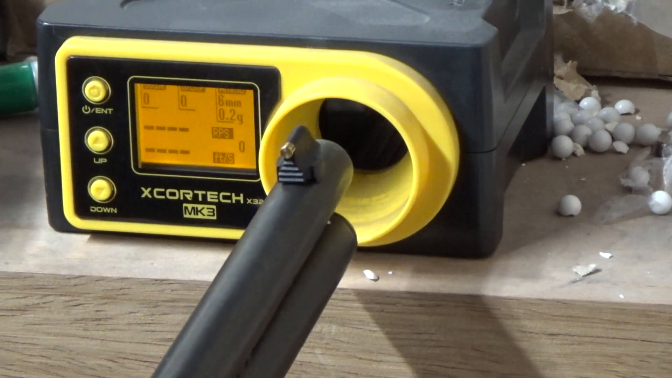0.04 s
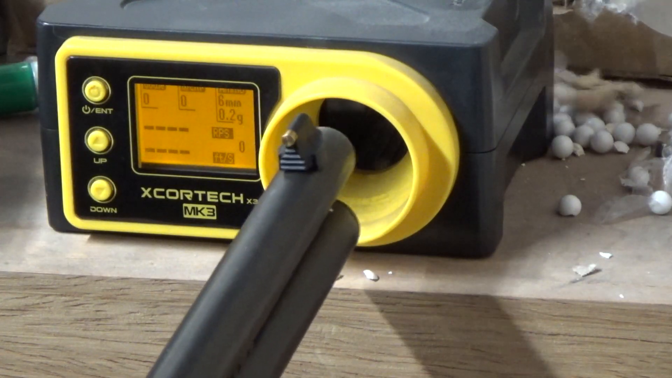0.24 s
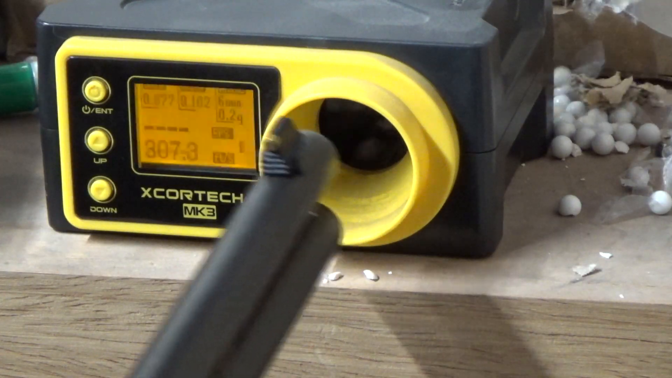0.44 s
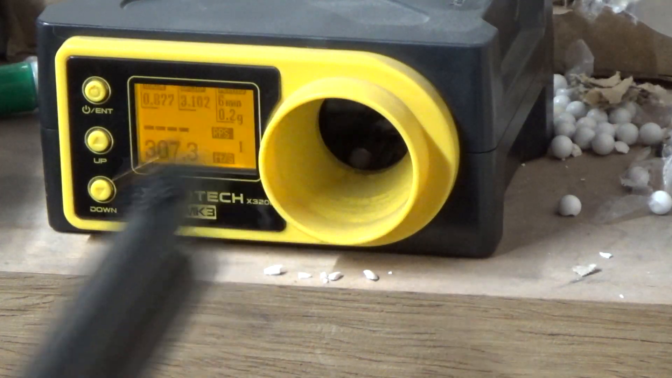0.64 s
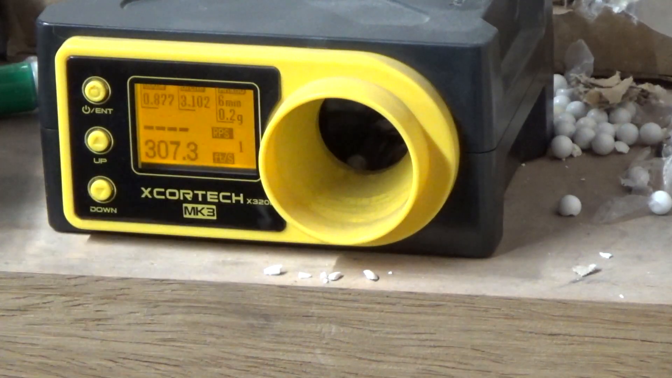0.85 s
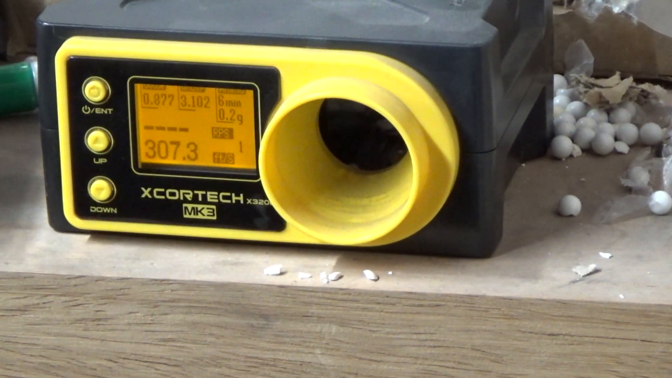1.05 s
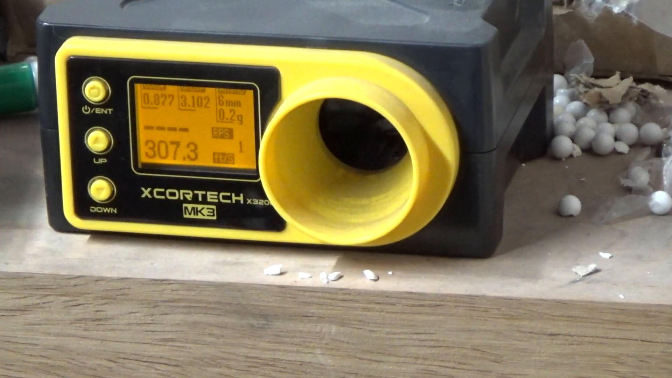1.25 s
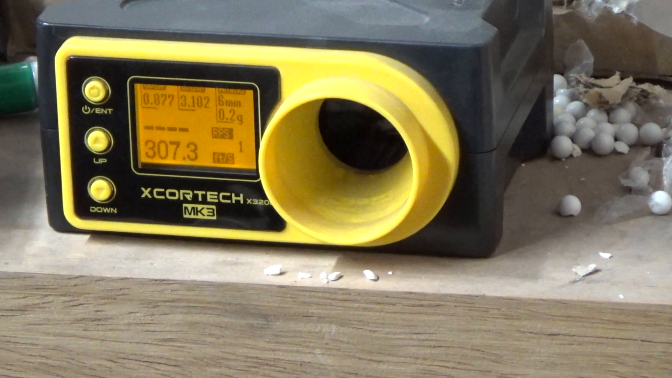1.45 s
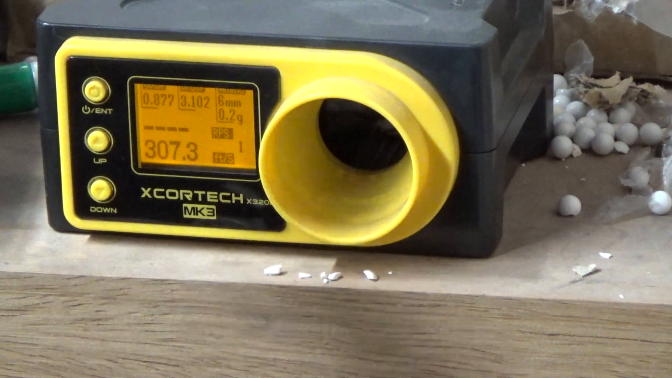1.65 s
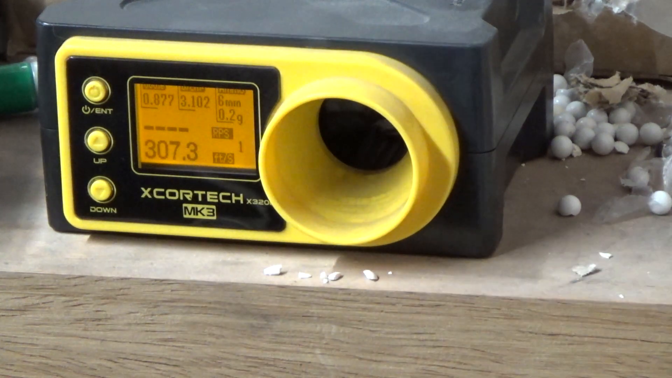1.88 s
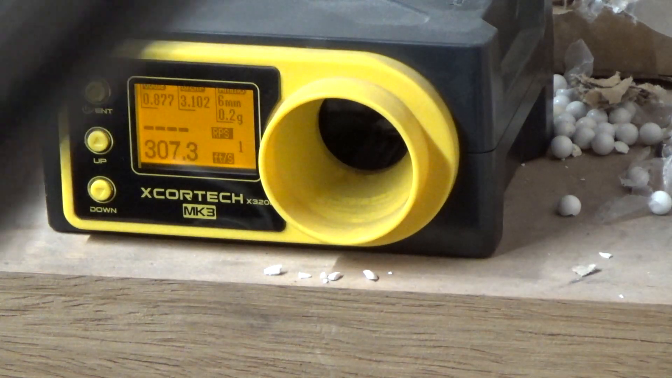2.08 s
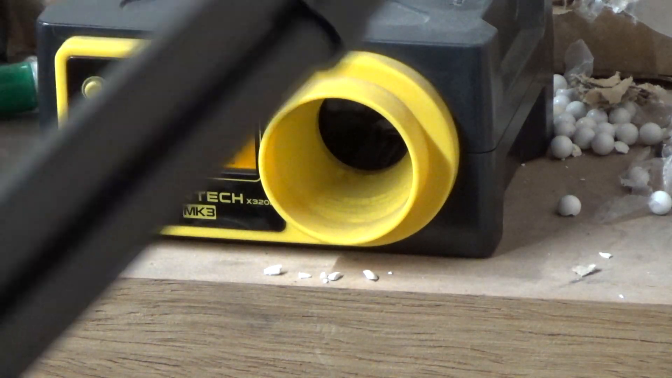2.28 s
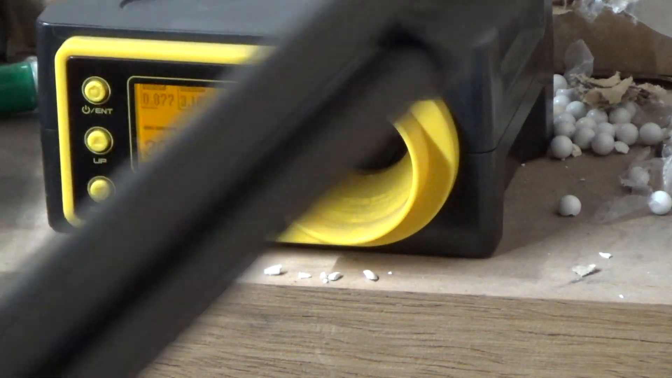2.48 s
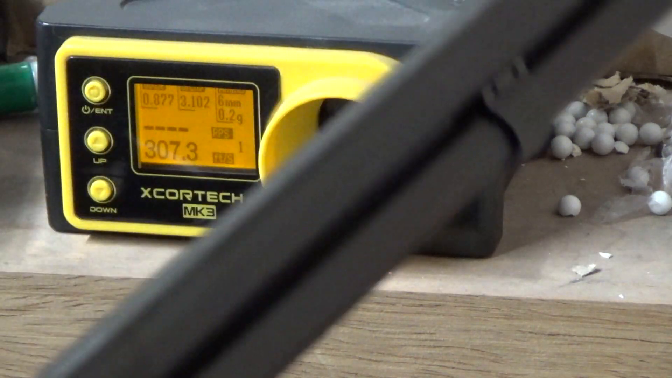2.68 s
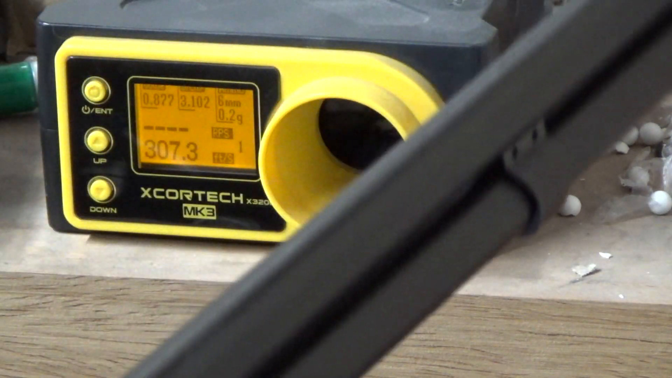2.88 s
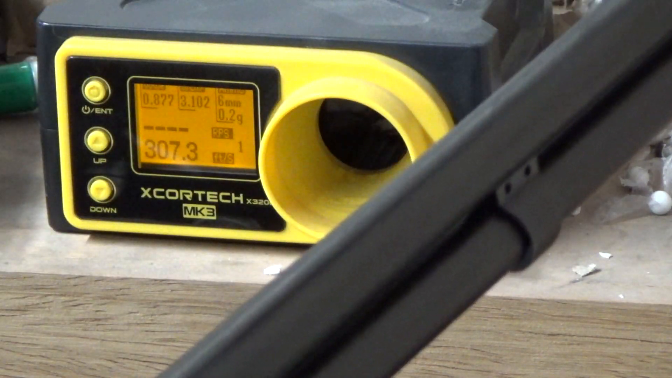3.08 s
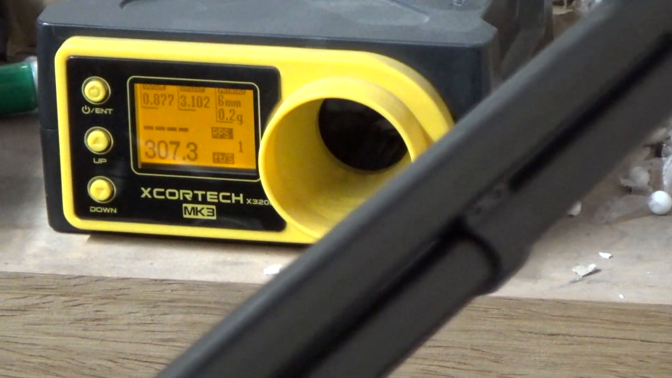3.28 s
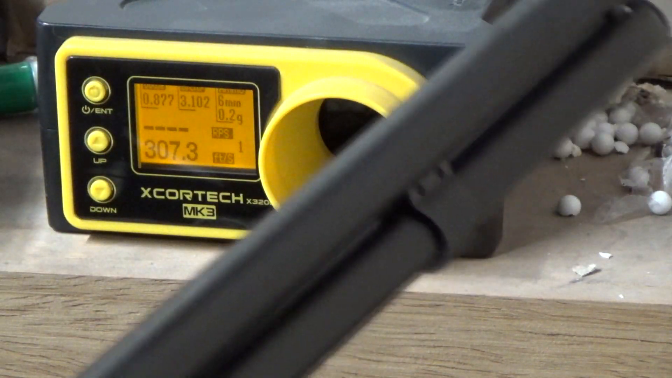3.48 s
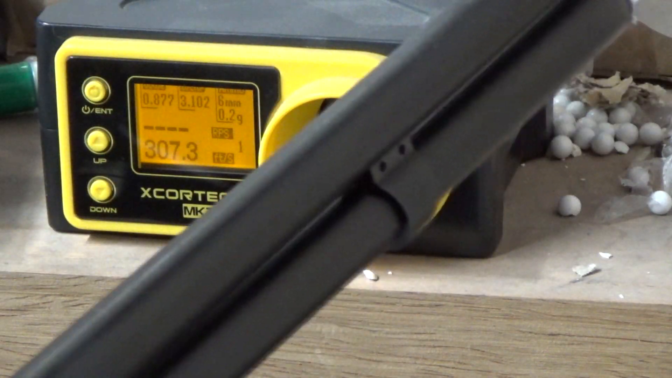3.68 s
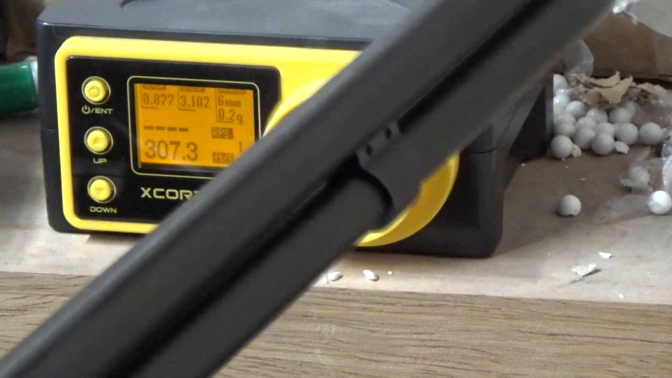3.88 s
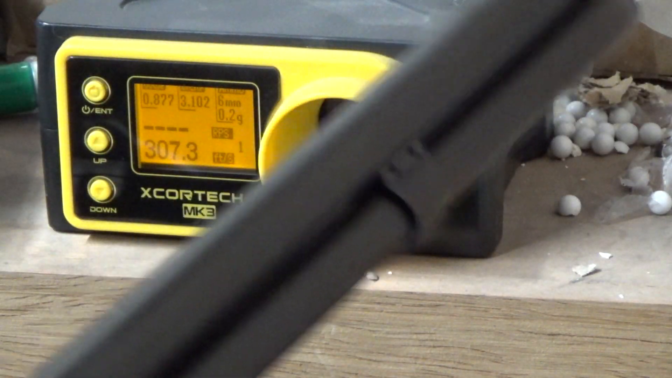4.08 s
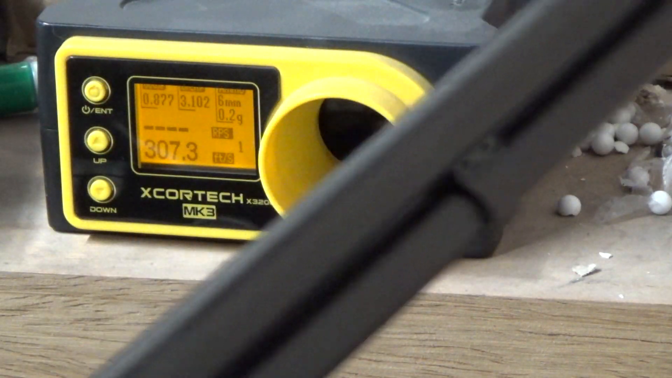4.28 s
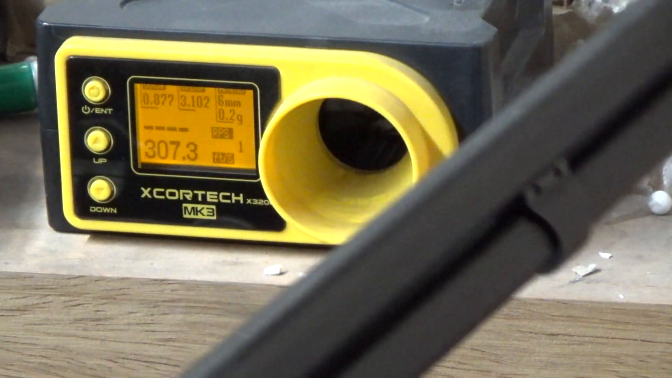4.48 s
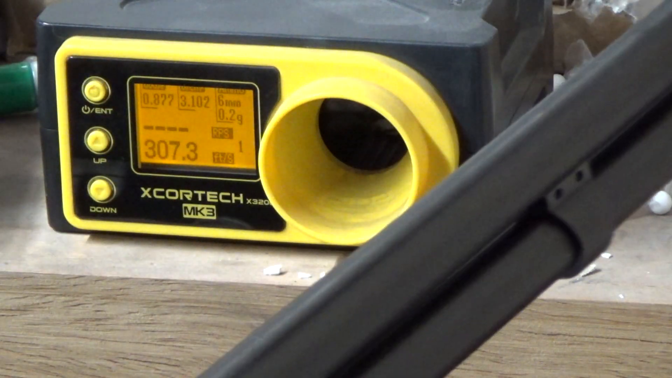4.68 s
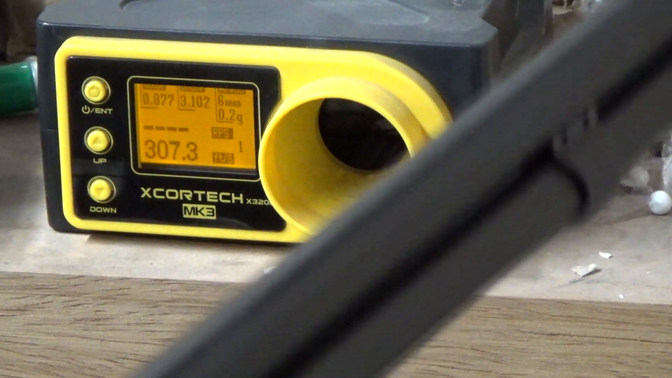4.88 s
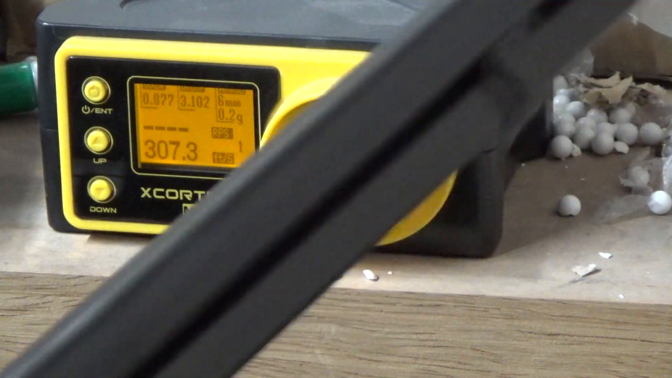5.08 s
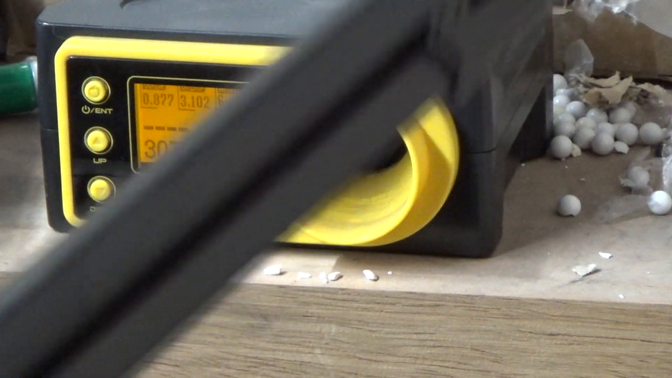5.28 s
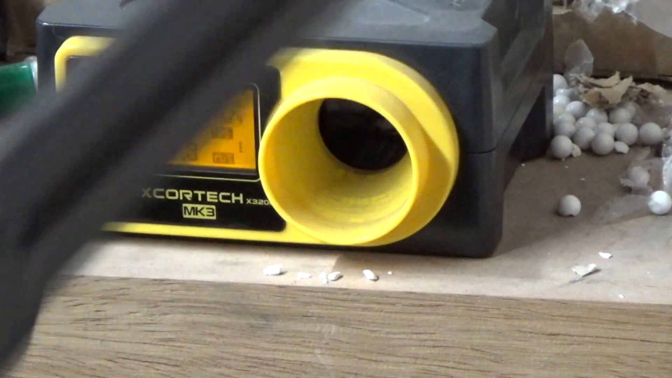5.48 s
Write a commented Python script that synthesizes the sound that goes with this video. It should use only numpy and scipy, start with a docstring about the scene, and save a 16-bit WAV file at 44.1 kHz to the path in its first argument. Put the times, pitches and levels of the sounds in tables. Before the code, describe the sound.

An air rifle cracks close by indoors with a gas hiss, a pellet rattles on the bench, then the lever is worked with metallic clacks.

```python
"""A shot cracks close to the microphone indoors, gas hisses, and a pellet and its chips bounce on a bench.
Then the lever of the air rifle is worked: parts slide, rub, latch and clink, and a spent shell drops.
Blows are short filtered bursts, sliding and gas are shaped noise, and clinks are decaying pairs of sines.
A small room answers with noise tails; a fan whines far off in steady hush and a low rumble swells twice.
The camera's limiter holds the loudest moments down."""
import sys
import numpy as np
from scipy import signal
from scipy.fft import rfft, irfft, next_fast_len
from scipy.io import wavfile
from scipy.ndimage import uniform_filter1d, minimum_filter1d, map_coordinates

SR = 44100
rng = np.random.default_rng(int(sys.argv[2]) if len(sys.argv) > 2 else 0)


def unload_audio(sound):
    """Save the sound as a 16-bit wav file, at the path given as the first command line argument."""
    columns = np.transpose(np.atleast_2d(sound))
    # keep every value between -1 and 1, then stretch to whole-number steps
    steps = np.round(np.clip(columns, -1, 1) * 32767)
    wavfile.write(sys.argv[1], SR, steps.astype(np.int16))


N = 244296
T = np.arange(N) / SR  # time of each sample [s]

# colour of steel parts at the microphone: (frequency [Hz], relative level [dB])
STEEL_COLOUR = [(59, -68), (100, -24.5), (421, -2.5), (499, -5), (1080, -7), (1430, -7), (1700, -8),
                (5630, -6), (6410, -10.5), (10700, -5), (13600, -11), (15800, -24), (16800, -66)]
# colour of the shot at the microphone: (frequency [Hz], relative level [dB])
BLAST_COLOUR = [(18, -55), (30, -22), (60, -4), (219, -8.5), (308, -3.5), (471, -12.5), (779, -13),
                (1400, -8.5), (1510, -10), (3530, -10.5), (5530, -4.5), (6480, -20), (9900, -12.5),
                (15500, -28), (16800, -77.5)]


def amp(db):
    """Decibels to gain."""
    return 10 ** (np.asarray(db) / 20)


def unit(x):
    """x at rms 1."""
    return x / np.sqrt(np.mean(x ** 2) + 1e-20)


def along(points, hz):
    """Values of (frequency, value) points, interpolated on a log frequency axis."""
    point_hz, values = np.transpose(points)
    return np.interp(np.log(hz + 1), np.log(point_hz + 1), values)


def filtered(x, response):
    """x times a response of frequency."""
    m = next_fast_len(x.shape[-1] + 8192)
    spectrum = rfft(x, m) * response(np.fft.rfftfreq(m, 1 / SR))
    return irfft(spectrum, m)[..., :x.shape[-1]]


def spread(pair, alike):
    """Two unrelated noises turned into a left and right of given likeness."""
    def mid_side_gains(hz):
        turn = np.arccos(np.clip(along(alike, hz), -1, 1)) / 2
        return np.array([np.cos(turn), np.sin(turn)])

    mid, side = filtered(pair, mid_side_gains)
    return np.array([mid + side, mid - side])


def bands(colour, hz):
    """Gains of the treble, middle and body ranges of a colour."""
    # where the ranges meet: (body to middle [Hz], middle to treble [Hz])
    split_hz = (1100, 7000)
    low, high = [1 / (1 + (hz / edge) ** 6) for edge in split_hz]
    return amp(along(colour, hz)) * [1 - high, high - low, low]


def band_noises(colour):
    """Treble, middle and body bands of one coloured noise, each of rms 1."""
    noise = rng.standard_normal(N)
    return [unit(band) for band in filtered(noise, lambda hz: bands(colour, hz))]


def resonance(hz, centre_hz, sharp):
    """Gain of one resonance; sharp is its quality factor."""
    return 1 / np.sqrt(1 + (sharp * (hz / centre_hz - centre_hz / (hz + 1))) ** 2)


def causal(gain):
    """The minimum-phase response of that gain: it starts at once and only rings afterwards."""
    cepstrum = irfft(np.log(gain + 1e-5))
    half = cepstrum.shape[-1] // 2
    cepstrum[..., 1:half] *= 2
    cepstrum[..., half + 1:] = 0
    return np.exp(rfft(cepstrum))


def swell(start, rise, hold, db, t60):
    """Gain that rises steadily in dB, holds, and dies away."""
    t = T - start
    rise_db = 23.5  # a swell starts this far under its top
    climb_db = rise_db * np.clip(1 - t / max(rise, 1e-3), 0, 1)
    fall_db = 60 * np.clip(t - rise - hold, 0, None) / t60
    return (t > 0) * amp(db - climb_db - fall_db)


def contacts(rows, colour, chatter, t60, sharp, hollow, body_db, body_hz, pan_db, room_db, middle_hz=None):
    """Each blow is a spike with a short chatter behind it; the struck part and the body set its two pitches."""
    heavy = 1.3  # dB more body for each dB more middle: a heavy contact also moves the stock
    light_db, light_hz = 4, 2050  # dB less body for each octave of the part above this pitch
    ringy = .65  # share of a blow's own uneven colour that the room carries on
    pan_scatter_db = 1.5  # contacts come from slightly different places
    direct, send = np.zeros((2, N + SR)), np.zeros(N + SR)
    t = np.arange(4096) / SR
    hz = np.fft.rfftfreq(len(t), 1 / SR)
    for s, db, middle_db, *pitch_hz in rows:
        blow = chatter * amp(-60 * t / t60) * rng.standard_normal(len(t))
        blow[0] = 1
        part_hz = middle_hz or pitch_hz[0]
        knock_db = heavy * middle_db - light_db * np.log2(part_hz / light_hz)
        part = resonance(hz, part_hz, sharp)
        body = resonance(hz, body_hz, hollow) ** 2
        shape = causal(bands(colour, hz) * [hz * 0 + 1, part, body])
        ranges = irfft(np.array([rfft(blow) * shape, shape]))  # with and without chatter
        ranges /= np.linalg.norm(ranges, axis=-1, keepdims=True)
        burst, even = amp(db) * amp([0, middle_db, body_db + knock_db]) @ ranges
        side_db = (pan_db + pan_scatter_db * rng.standard_normal()) / 2
        first = round(s * SR)
        direct[:, first:][:, :len(t)] += amp([[side_db], [-side_db]]) * burst
        send[first:][:len(t)] += amp(room_db) * (ringy * burst + (1 - ringy) * even)
    return direct[:, :N], send[:N]


def hush():
    """Steady room air and camera hiss: coloured noise, partly alike on the left and right."""
    # colour of the hush: (frequency [Hz], relative level [dB])
    hush_colour = [(15, -25), (25, -3.5), (304, 0), (433, -1), (483, -1.5), (634, -2.5), (878, -2),
                   (952, 0.5), (1220, -1.5), (1360, -4), (10700, -15.5), (15200, -16), (16500, -32)]
    # left-right likeness: (frequency [Hz], likeness [-1 to 1])
    hush_alike = [(60, 1), (240, 0.74), (950, 0.064), (3770, 0.5), (15000, 1)]
    pair = filtered(rng.standard_normal((2, N)), lambda hz: amp(along(hush_colour, hz)))
    return amp(-57.5) * unit(spread(pair, hush_alike))


def fan():
    """A far fan whines: noise through one narrow resonance."""
    # the whine: (centre [Hz], half width at half gain [Hz], level [dB rms])
    whine = (915, 46, -69)
    centre_hz, width_hz, db = whine
    noise = rng.standard_normal(N)
    return amp(db) * unit(filtered(noise, lambda hz: 1 / (1 + ((hz - centre_hz) / width_hz) ** 2)))


def rumble():
    """A low rumble swells twice: noise in a narrow band around 55 Hz."""
    # the two swells: (start [s], rise [s], hold [s], level [dB])
    rumble_swells = [(2.316, .8, 0.14, -61), (3.503, .2, .2, -74)]
    low = unit(filtered(rng.standard_normal(N), lambda hz: 1 / (1 + ((hz - 55) / 8) ** 4)))
    return sum(swell(*row, t60=.2) for row in rumble_swells) * low


def room(x, gap=.003):
    """Near surfaces answer first and briefly; then each frequency dies at its own speed."""
    # how long the room rings: (frequency [Hz], t60 [s])
    room_t60 = [(300, 0.38), (800, 0.31), (2100, 0.32), (5500, 0.25), (14000, 0.18)]
    # left-right likeness of the tail: (frequency [Hz], likeness [-1 to 1])
    room_alike = [(300, 0.99), (4000, .75), (8000, 0.79), (14000, 1)]
    out, step = np.zeros((2, N + SR)), SR // 10
    for i in range(0, N, step):  # a new tail every tenth of a second, as the rifle moves
        noise = spread(rng.standard_normal((2, SR // 2)), room_alike)
        hz, t, z = signal.stft(noise, SR, nperseg=128)
        late = amp(-60 * t / along(room_t60, hz)[:, None])
        near = 1.13 * amp(-60 * t / 0.022)
        tail = signal.istft(z * (late + near), SR, nperseg=128)[1]
        wet = signal.fftconvolve(x[None, i:i + step], tail / np.linalg.norm(tail[0]), axes=1)
        out[:, i + round(gap * SR):][:, :wet.shape[1]] += wet
    return out[:, :N]


def sliding():
    """Rough steel on steel: uneven grains of noise over the hollow stock; the grip sets the pitch of a rub."""
    # parts sliding: (start [s], rise [s], hold [s], treble level [dB], middle re treble [dB])
    slides = [(1.525, .12, .03, -61, 0.5), (1.675, .02, 0.013, -50.5, 7.5), (2.419, .002, 0.0033, -44, 5),
              (2.432, .01, 0.16, -49.5, 3.5), (2.513, .055, 0.024, -44, -18),
              (3.461, 0.0027, 0.064, -37.5, 1.5), (4.945, .004, .04, -55, 1),
              (4.998, .006, 0.091, -34.5, -1), (5.147, .07, 0.031, -33, -1.5), (5.487, .016, .005, -64, 4)]
    # hands on the stock: (start [s], rise [s], hold [s], level [dB], pitch [Hz])
    rubs = [(1.687, 0.034, 0.014, -48, 1020), (1.836, 0.027, .008, -52, 750),
            (2.418, 0.022, 0.016, -39.5, 543), (3.522, 0.019, 0.041, -50, 466),
            (3.627, 0.01, .005, -56, 650), (3.74, 0.011, .005, -59, 547), (3.771, 0.016, .005, -54, 660),
            (3.826, 0.046, .13, -56.5, 610), (5.123, 0.0061, 0.0068, -42, 486),
            (5.432, 0.014, 0.03, -67, 900)]
    treble, middle, body = band_noises(STEEL_COLOUR)
    uneven_db = 3.5 * map_coordinates(rng.standard_normal(N // 60 + 4), [np.arange(N) / 60])
    grains = unit(amp(uneven_db))

    def hollow(centre_hz, sharp):
        return unit(filtered(body, lambda hz: resonance(hz, centre_hz, sharp) ** 2))

    stock = amp(-17) * hollow(590, sharp=1.7)
    out = np.zeros(N)
    for s, rise, hold, db, middle_db in slides:
        steel = grains * (treble + amp(middle_db) * middle)
        out += swell(s, rise, hold, db, t60=0.17) * (steel + stock)
    for s, rise, hold, db, pitch_hz in rubs:
        sharp = 0.92 * max(hold, .005) ** -.3  # a long rub wanders over the stock and sounds broader
        out += swell(s, rise, hold, db, t60=.07) * hollow(pitch_hz, sharp)
    return out


def clinks():
    """A close pair for each mode, so the ring beats; a loose part rattles and blurs it, a touch stops it."""
    # parts left ringing until touched again: (time [s], part, level [dB], length [s])
    clink_rows = [(.316, "chip", -11.5, .03), (1.684, "spring", -42.5, 0.048), (3.469, "lever", -19, .035),
                  (3.524, "lever", -17.5, 0.077), (4.915, "sear", -41.5, .02),
                  (4.957, "lever", -29.5, 0.0088), (5.008, "pin", -14.5, 0.032),
                  (5.188, "spring", -27.5, 0.066)]
    # each part: rattle [0 to 1] and its modes (frequency [Hz], level [dB], t60 [s])
    ringing_parts = {"lever": (0.75, [(9800, 3.5, 0.096), (12950, -2, 0.22)]),
                     "pin": (0.19, [(11000, 5.5, .07)]), "spring": (0.52, [(1340, 2.5, 0.37)]),
                     "sear": (0.22, [(2070, 0, 0.03)]), "chip": (0.48, [(11600, -0.5, 0.043)])}
    out = np.zeros(N)
    for s, part, db, length in clink_rows:
        t = np.clip(T - s, 0, None)
        rattle, modes = ringing_parts[part]
        touch = 1 / (1 + np.exp(np.clip((t - length) / 0.0012, -50, 50)))
        for hz, mode_db, t60 in modes:
            pair = np.sin(2 * np.pi * hz * t) + .5 * np.sin(2 * np.pi * (hz - 75) * t)
            shake = map_coordinates(rng.standard_normal(N // 30 + 4), [np.arange(N) / 30])
            shaken = 1 - rattle + rattle * shake
            out += amp(db + mode_db - 60 * t / t60) * shaken * pair * touch
    return out


def catch():
    """A spring catch snaps, later ticks over its notches: short sharp blows on one small steel part."""
    # snaps and ticks: (time [s], treble energy [dB], middle re treble [dB])
    catch_blows = [(1.7932, 0, 3.5), (1.7955, -8.5, 6.5), (3.5955, -4.5, -1.5), (3.6142, -12.5, 2),
                   (3.6308, -19, 5), (3.6378, -22.5, 5), (3.6595, -28, 4), (3.6675, -27, 10), (3.68, -6, 2)]
    return contacts(catch_blows, STEEL_COLOUR, chatter=0.28, t60=0.0094, sharp=2.8, hollow=1.6, body_db=-35,
                    body_hz=637, pan_db=2.3, room_db=-6.5, middle_hz=6100)


def shell():
    """A spent shell drops on the bench and bounces: clean blows with little chatter and a broad body."""
    # bounces: (time [s], treble energy [dB], middle re treble [dB])
    shell_blows = [(4.1495, 2.5, 2), (4.1547, -12.5, -1), (4.1611, -7, 2), (4.3788, -26.5, 14),
                   (4.3992, -1.5, -7.5), (4.435, -31, 8), (4.4814, -30.5, 11), (4.5352, -44.5, 16),
                   (4.6768, -17.5, -3), (4.7042, -47, 16.5)]
    # colour of shell and bench at the microphone: (frequency [Hz], relative level [dB])
    bench_colour = [(47, -50), (80, -13.5), (274, 2.5), (313, -1.5), (1030, 1), (1120, 0.5), (1500, -8),
                    (9610, -9.5), (12900, -18.5), (16800, -29)]
    return contacts(shell_blows, bench_colour, chatter=.12, t60=0.01, sharp=0.75, hollow=0.098, body_db=-10,
                    body_hz=500, pan_db=2.7, room_db=-1.0, middle_hz=2900)


def pellet():
    """The pellet and its chips bounce on the bench: bright blows with much chatter and little body."""
    # bounces: (time [s], treble energy [dB], middle re treble [dB])
    pellet_blows = [(0.2809, -7, -5), (0.2994, 7.5, -7.5), (0.317, -5, -3), (0.3245, -12, 5),
                    (0.3467, -11.5, 4), (0.3517, -2, -2), (0.387, 5, -8), (0.3924, -20.5, 10.5),
                    (0.418, -23, 7), (0.4306, -3.5, -3), (0.4449, -5, -3.5), (0.4628, -14.5, 5.5),
                    (0.485, -12, 1.5), (0.5148, -39, 2), (0.5268, -34.5, 13), (0.541, -47, 6)]
    # colour of the pellet on the bench: (frequency [Hz], relative level [dB])
    plastic_colour = [(590, -23), (1000, -8), (2010, -7.5), (2420, -3.5), (2930, -9.5), (4270, -2.5),
                      (8580, 0), (9770, 17), (13100, 2), (16000, -12), (16800, -54)]
    return contacts(pellet_blows, plastic_colour, chatter=0.82, t60=0.013, sharp=0.28, hollow=2.1,
                    body_db=-20.5, body_hz=774, pan_db=0.5, room_db=-2.5, middle_hz=4700)


def action():
    """Metal meets metal in the action: each struck part has its own pitch over the hollow stock."""
    # contacts: (time [s], treble energy [dB], middle re treble [dB], pitch of the struck part [Hz])
    action_blows = [(1.1666, -41, 6.5, 1250), (1.2592, -35, -5, 2630), (1.705, -8.5, -15, 1320),
                    (1.9442, -36.5, 7.5, 1240), (2.0013, -35, 7.5, 4960), (2.172, -37, -0.5, 1230),
                    (2.4232, -8, -8.5, 2580), (2.4482, -13.5, 8.5, 5500), (2.4538, -13, 11.5, 1410),
                    (2.5187, -22, 11, 1760), (2.5393, -12.5, 9.5, 1330), (2.5669, -0.5, -13.5, 2200),
                    (2.5702, -10, 3.5, 2050), (2.5894, -20.5, 6, 3030), (3.3386, -36.5, 1.5, 1930),
                    (3.4658, -2, -10.5, 2500), (3.4697, -1, -1.5, 5390), (3.4771, -4.5, 0, 2670),
                    (3.483, -9, -1, 4570), (3.4886, -2, -14, 2550), (3.4934, -1, -3.5, 2450),
                    (3.5179, -10, 4.5, 3430), (3.5265, -4, -6, 2400), (3.5323, 3, -1.5, 2100),
                    (3.5511, -11.5, -3, 1990), (4.9578, -8.5, -6.5, 2930), (4.9737, -3, -11.5, 1990),
                    (4.978, 1, 1.5, 1790), (5.0025, -2, -2, 5830), (5.0425, -3, -5, 2030),
                    (5.0525, 3.5, -6.5, 2250), (5.1252, -11, 11, 1840), (5.1306, -14.5, 10.5, 1350),
                    (5.1728, -12, -7, 5230), (5.1778, -13, 9.5, 6940), (5.1816, -11, 5, 1360),
                    (5.2065, -4, 2.5, 1480), (5.2005, -12, 3.5, 1400), (5.2124, 2, -2, 1370),
                    (5.2154, 4, 3, 5800), (5.2215, -2, -7, 1820)]
    return contacts(action_blows, STEEL_COLOUR, chatter=0.39, t60=0.014, sharp=1.3, hollow=1.7, body_db=-16,
                    body_hz=602, pan_db=3.5, room_db=0.0)


def gas():
    """The charge hisses out behind the pellet: noise with a moving level and low end."""
    # gas leaving the muzzle: (time [s], level [dB], body level [dB] against it)
    gas_rows = [(0.152, -49, -6.5), (0.16, -40.5, -10), (0.19, -30.5, -12.5), (0.244, -29.5, -17),
                (0.29, -37, -9)]
    treble, middle, body = band_noises(BLAST_COLOUR)
    s, db, low_db = np.transpose(gas_rows)
    gain = amp(np.interp(T, s, db, -150, -150))  # silent outside the table
    low = amp(np.interp(T, s, low_db))
    return gain * (1.24 * treble + 1.19 * middle + low * body)


def shot():
    """Muzzle blast and its first strong returns: dense noisy bursts over a broad body."""
    # blast and returns: (time [s], treble energy [dB], middle re treble [dB])
    shot_blows = [(0.1591, 3, -2.5), (0.1624, 6, -3.5), (0.1669, 15.5, -17.5), (0.1726, 8, 0.5)]
    return contacts(shot_blows, BLAST_COLOUR, chatter=1.0, t60=0.0076, sharp=0.25, hollow=1.23, body_db=-0.5,
                    body_hz=894, pan_db=3.5, room_db=8.5, middle_hz=5300)


def scene():
    """Every source, direct and through the room."""
    blows = [catch(), shell(), pellet(), action(), shot()]
    direct = sum(near for near, send in blows)
    sends = sum(send for near, send in blows)
    rubbed = sliding() + clinks() + gas()
    wet = room(sends + amp(-5.5) * rubbed)
    background = hush() + fan() + rumble()
    return background + wet + rubbed * amp([[.4], [-.4]]) + direct


def record(dry):
    """A limiter that reacts in a millisecond or two and holds briefly, then the band limit."""
    needed = np.minimum(1, 0.43 / (np.abs(dry).max(axis=0) + 1e-9))
    held = minimum_filter1d(needed, size=221, origin=95)  # mostly looks back, so the gain stays down
    gain = uniform_filter1d(held, size=81)
    top_hz = 16950
    return filtered(dry * gain, lambda hz: hz < top_hz)


dry = scene()
out = record(dry)
unload_audio(out)
```